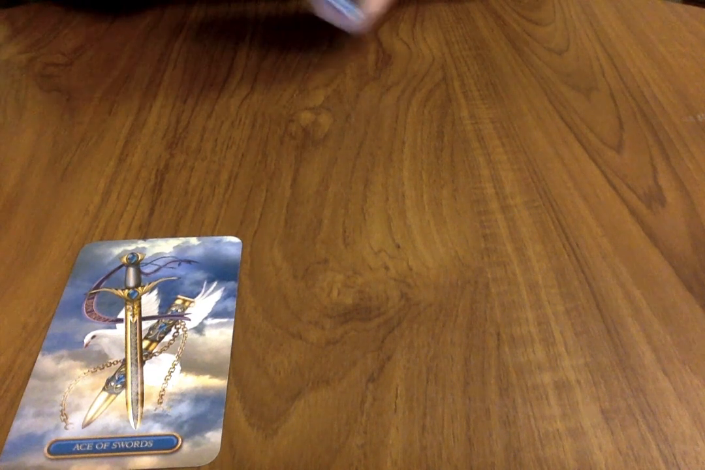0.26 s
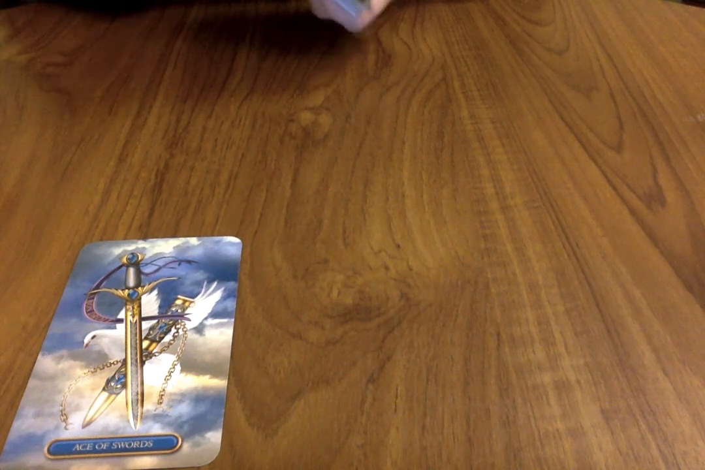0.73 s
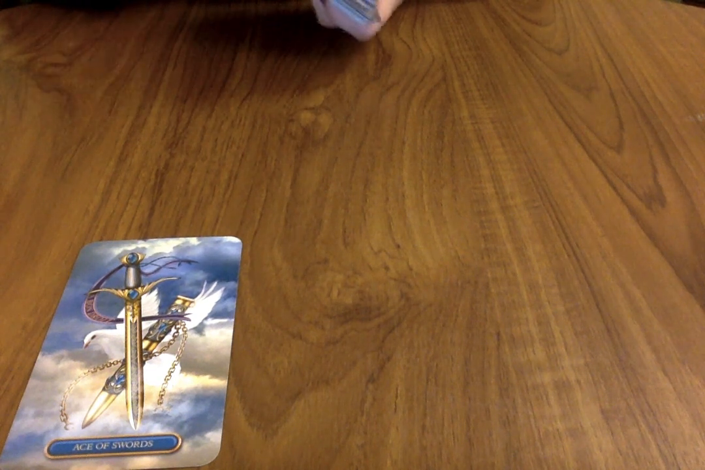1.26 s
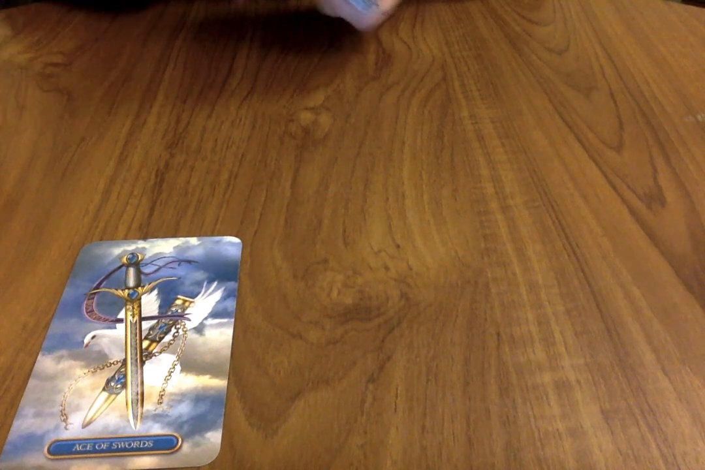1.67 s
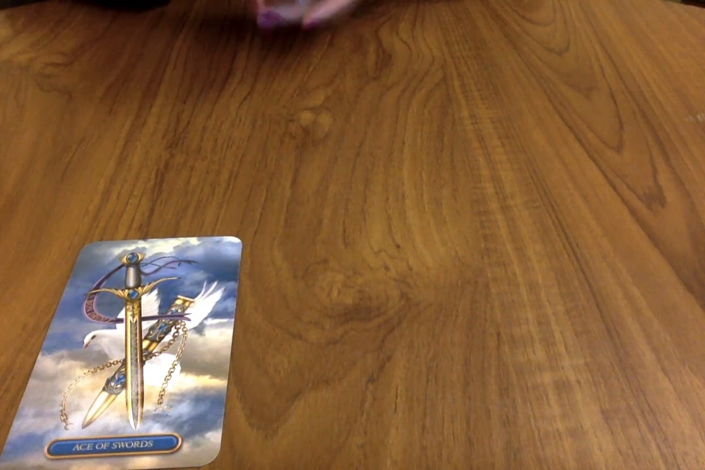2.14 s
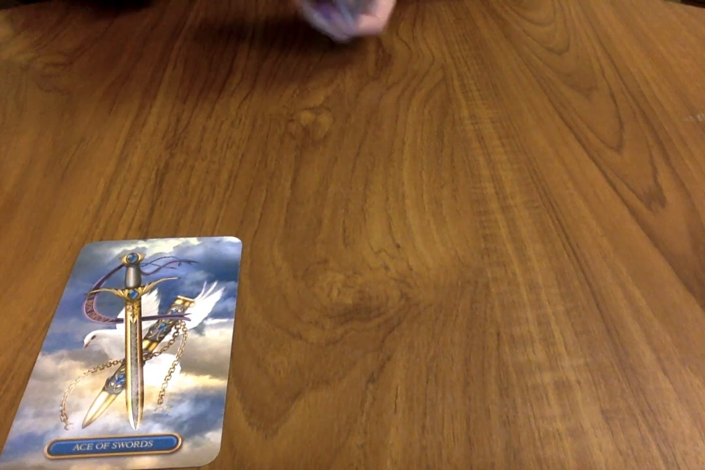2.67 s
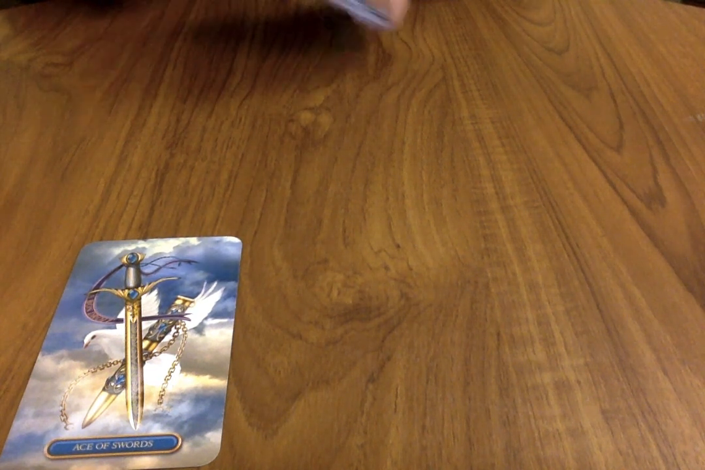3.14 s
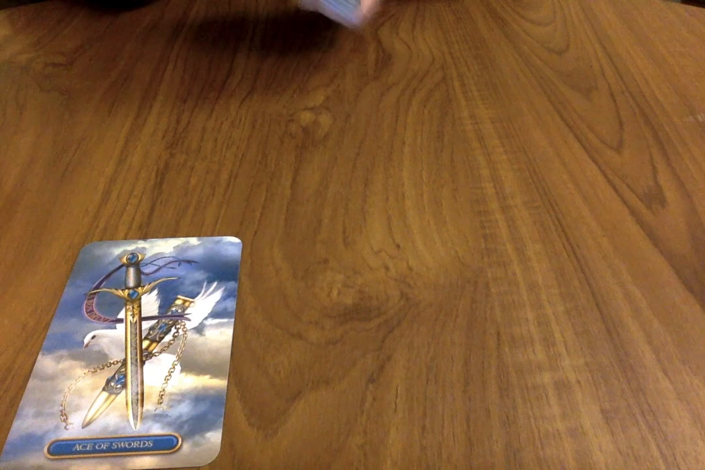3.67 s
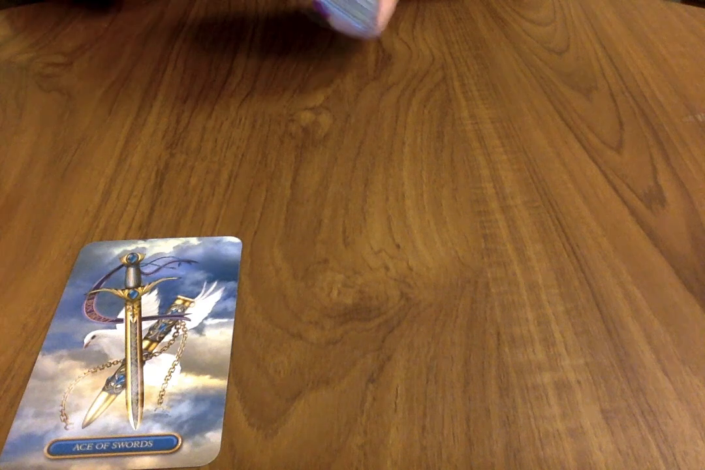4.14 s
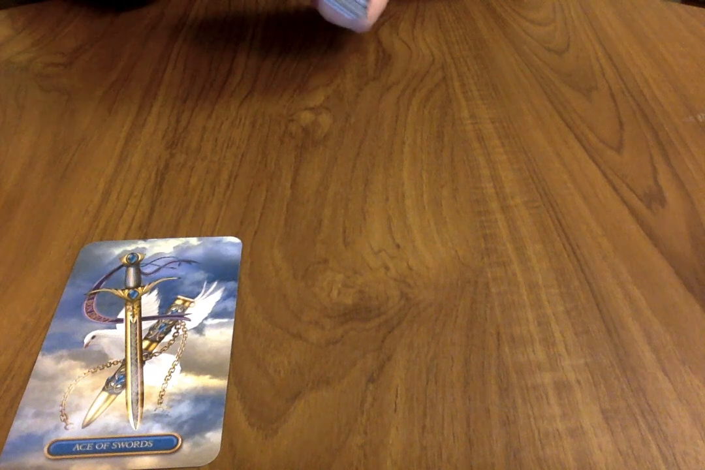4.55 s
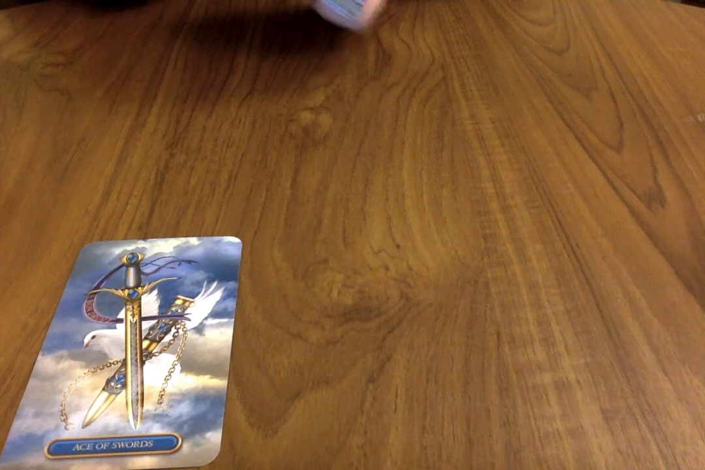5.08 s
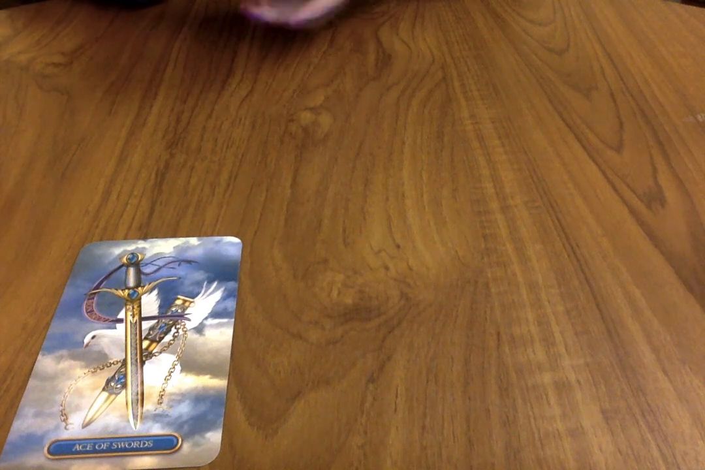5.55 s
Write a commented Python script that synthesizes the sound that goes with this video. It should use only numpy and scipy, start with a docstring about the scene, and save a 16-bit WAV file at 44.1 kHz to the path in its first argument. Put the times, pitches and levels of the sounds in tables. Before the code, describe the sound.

Glossy cards are shuffled by hand over a wooden table, with hissing slides and quick, irregular flicks and slaps.

```python
"""Just above a wooden table in a small room, glossy cards are shuffled overhand, close to a microphone.
Packets slide with a gritty hiss, zip free, then land in quick flicks and slaps that ring the deck
and the table top. Nudged by the hands, the table wobbles at its lowest mode. The room adds a short
tail, and the loudest slaps overload the input."""
import sys
import numpy as np
from scipy import signal
from scipy.fft import rfft, irfft, next_fast_len
from scipy.io import wavfile
from scipy.ndimage import uniform_filter1d

SR = 44100
rng = np.random.default_rng(int(sys.argv[2]) if len(sys.argv) > 2 else 0)


def generate_wav(signal):
    """Clip the signal to [-1, 1] and save it as 16-bit WAV at the path in sys.argv[1]."""
    frames = np.transpose(np.atleast_2d(signal))
    scaled = np.clip(frames, -1, 1) * 32767
    pcm = np.round(scaled).astype(np.int16)
    wavfile.write(sys.argv[1], SR, pcm)


N = 256662


def undb(db):
    """Level in dB to gain."""
    return 10 ** (np.asarray(db) / 20)


def unit(x):
    """x scaled to rms 1."""
    return x / np.sqrt(np.mean(x ** 2))


def colour(x, shape):
    """x filtered by a curve of (freq_hz, gain_db) points."""
    hz, db = np.transpose(shape)
    size = next_fast_len(len(x))
    bins_hz = np.maximum(np.fft.rfftfreq(size, 1 / SR), 1)
    gain = undb(np.interp(np.log(bins_hz), np.log(hz), db))
    return irfft(rfft(x, size) * gain, size)[:len(x)]


def ring(x, hz, width_hz):
    """One resonance, gain 1 at its centre."""
    return signal.lfilter(*signal.iirpeak(hz, hz / width_hz, SR), x)


def grit(count, spread_db):
    """Noise with very unequal grains, rms 1."""
    noise = rng.standard_normal(count)
    return unit(noise * undb(spread_db * np.minimum(rng.exponential(size=count), 6.5)))


def walk(rate_hz):
    """Random steps at rate_hz, smoothed twice, rms 1."""
    hold = int(SR / rate_hz)
    steps = np.repeat(rng.standard_normal(N // hold + 1), hold)
    return unit(uniform_filter1d(uniform_filter1d(steps, hold), hold)[:N])


def add(out, start_s, x):
    """Mix x into out from start_s."""
    i = int(start_s * SR)
    out[i:i + len(x)] += x[:N - i]


def background():
    """Faint steady noise, mostly bass."""
    # noise floor: freq_hz, density_db
    spectrum = [(24, -20), (40, 9), (319, -13), (5500, -31), (8240, -26), (13300, -38), (15800, -44)]
    return undb(-51) * unit(colour(rng.standard_normal(N), spectrum))


def room(x, t60_s=0.3, level_db=-17):
    """Short diffuse tail of a small room."""
    # tail colour: freq_hz, density_db
    spectrum = [(59, -35), (100, -6.5), (2000, -4.5), (3110, -11), (9460, -3), (13000, -10.5),
                (15000, -14.5)]
    t = np.arange(SR // 2) / SR
    envelope = (1 - np.exp(-t / 0.0005)) * undb(-60 * t / t60_s)
    tail = colour(rng.standard_normal(len(t)), spectrum) * envelope
    return undb(level_db) * signal.fftconvolve(x, tail / np.sqrt(np.sum(tail ** 2)))[:N]


def table_wobble(mode_hz=29.5, rise_s=.02, floor_db=-60):
    """Lowest table mode: a slightly wandering sine that swells at each nudge and dies away."""
    # hands nudge the table: start_s, level_db, t60_s (short while the wrists rest on it)
    nudges = [(0, -32, 1.2), (.33, -37, 1.2), (.56, -30, .9), (.83, -36, 1.2), (1.1, -30, 1.5),
              (1.17, -27, 1.1), (1.45, -34, 1.3), (2.42, -29, .35), (3.1, -36, .3), (3.36, -40, .5),
              (4.02, -37, .5), (4.5, -44, 1.6), (5.15, -36, 1.3), (5.33, -39, 1.2)]
    t = np.arange(N) / SR
    power = np.full(N, undb(floor_db) ** 2)
    for start_s, level_db, t60_s in nudges:
        add(power, start_s, ((1 - np.exp(-t / rise_s)) * undb(level_db - 60 * t / t60_s)) ** 2)
    throb_db = 1.3 * walk(8)
    hz = mode_hz * (1 + 0.022 * walk(15))
    return np.sqrt(2 * power) * undb(throb_db) * np.sin(2 * np.pi * np.cumsum(hz) / SR)


def slide_envelopes(cards, rest_db=-57):
    """Sheen, body and scrape gains: cards rub at rest, under the thumb and as they settle."""
    # thumb pulls cards across the deck: start_s, length_s, end_db, swell_db, scrape_db
    pulls = [(0, 0.066, -56.5, -13, 12), (0.163, 0.075, -26.5, 15.5, -6.5), (0.377, 0.064, -39, 1.5, -5),
             (0.48, 0.13, -20, 12.5, -11.5), (0.622, 0.026, -30.5, -6.5, 0),
             (0.676, 0.029, -19.5, 13.5, -1.5), (0.744, 0.059, -34, -5.5, 1.5),
             (1.078, 0.058, -22, 15.5, -23), (1.346, 0.08, -23.5, 17.5, -5), (1.628, 0.047, -24, 19, -3),
             (1.731, 0.032, -40.5, -2, 8.5), (1.794, 0.053, -31, 0, -8), (1.875, 0.078, -32.5, 14.5, -0.5),
             (2.025, 0.076, -34.5, 11, 1.5), (2.19, 0.048, -40, 0, 0), (2.301, 0.074, -34, 1.5, -8),
             (2.381, 0.067, -25, 3, -18), (2.492, 0.23, -37.5, 0, 7), (2.683, 0.039, -28, 12, 8),
             (2.91, 0.028, -47, 11, 4), (3.002, 0.044, -25, 12.5, -9), (3.056, 0.068, -23, 7.5, 1.5),
             (3.318, 0.1, -21.5, 14, -5.5), (3.614, 0.079, -29, 7, -7), (3.68, 0.069, -22, 6, -11),
             (3.91, 0.0866, -19.5, 24.5, -7), (4.223, 0.035, -30, 5.5, -5.5), (4.273, 0.11, -28.5, 0, -5.5),
             (4.447, 0.085, -27, 6.5, -8.5), (4.544, 0.088, -36, -4, 2.5), (4.823, 0.093, -31, 1, -4.5),
             (4.99, 0.037, -38, 7, -9.5), (5.093, 0.011, -31, 5, 3.5), (5.283, 0.069, -41, -11, -7.5),
             (5.358, 0.063, -31.5, 9, -3.5), (5.523, 0.072, -45, -7.5, -2), (5.755, 0.071, -31.5, 14, 1.5)]
    grip_db_per_s, release_db_per_s = 1202, 705.5
    settle_db_per_s, sheen_extra_db_per_s = 246, 195
    t = np.arange(SR // 2) / SR
    sheen, body, scrape = np.full((3, N), undb(rest_db) ** 2)
    for start_s, length_s, end_db, swell_db, scrape_db in pulls:
        begin_s = max(start_s - .1, 0)
        since_s = t + begin_s - start_s
        remaining = 1 - np.clip(since_s / length_s, 0, 1)
        grip_db = grip_db_per_s * np.maximum(-since_s, 0)
        release_db = release_db_per_s * np.maximum(since_s - length_s, 0)
        power = undb(end_db - swell_db * remaining ** 0.9 - grip_db - release_db) ** 2
        add(sheen, begin_s, power)
        add(body, begin_s, power * undb(1.5 + 0.46 * scrape_db) ** 2)  # thin if cards bend little
        add(scrape, begin_s, power * undb(scrape_db) ** 2)
    for start_s, level_db, _, treble_db, *_ in cards:
        power = undb(level_db - settle_db_per_s * t) ** 2
        sheen_db = -23.5 + 0.44 * treble_db - sheen_extra_db_per_s * t  # dull landings hiss less
        add(sheen, start_s, power * undb(sheen_db) ** 2)
        add(body, start_s, power * undb(-28.5) ** 2)
        add(scrape, start_s, power * undb(-22) ** 2)
    return np.sqrt([sheen, body, scrape])


def varnish_hiss(flicker_db=2.2, split_hz=6060):
    """Varnish friction, flickering by band; returns the sheen above split_hz and the body below."""
    # friction hiss: freq_hz, density_db
    spectrum = [(1760, -34), (3000, -5), (4710, -4), (11300, -0.5), (13900, -5), (15800, -1)]
    # borders of the flickering bands: edge_hz
    edges_hz = (4500, 7000, 9500, 12000)
    steady = unit(colour(grit(N, 1.8), spectrum))
    lowpassed = [signal.sosfilt(signal.butter(2, hz, fs=SR, output="sos"), steady) for hz in edges_hz]
    bands = np.diff([np.zeros(N), *lowpassed, steady], axis=0)
    hiss = sum(band * undb(flicker_db * walk(70)) for band in bands)
    hiss *= undb(1.48 * walk(90) - 1.5)
    body = colour(hiss, [(split_hz / 1.1, 0), (split_hz, -30)])
    return hiss - body, body


def bending_scrape(top_hz=4770):
    """Dull, jerky scrape of bending cards."""
    rub = colour(grit(N, 2.9), [(top_hz, 0), (2 * top_hz, -15)])
    scrape = unit(ring(rub, 2050, 2500)) + undb(-2.5) * unit(ring(rub, 460, 480))
    return undb(3.5 * walk(60) - 10.5) * scrape


def edge_catches(band_rate_per_s=25):
    """Sliding edges catch: random ticks in four bands."""
    ticks = (rng.random((4, N)) < band_rate_per_s / SR) * rng.standard_normal((4, N))
    bands_hz = (2300, 3700, 6000, 9500)
    return sum(np.sqrt(SR / hz) * ring(train, hz, hz / 4) for train, hz in zip(ticks, bands_hz))


def slide(cards):
    """Card on card: hiss, scrape and catches under their envelopes."""
    sheen_gain, body_gain, scrape_gain = slide_envelopes(cards)
    sheen, body = varnish_hiss()
    scrape = bending_scrape()
    return sheen_gain * (sheen + undb(15) * edge_catches()) + body_gain * body + scrape_gain * scrape


def zips(whistle_width_hz=1800):
    """Jerky swells of hiss as a packet speeds up and lets go; the closing gap whistles and glides."""
    # packets zip free: start_s, length_ms, level_db, first_hz, last_hz, peak_fraction
    releases = [(0.221, 19, -17, 8500, 7380, 0.45), (0.266, 13.6, -12.5, 11000, 7000, .2),
                (0.565, 50, -13, 8000, 9460, 0.42), (0.712, 38, -12, 10360, 8930, 0.24),
                (1.113, 33, -27, 10100, 10300, .5), (1.404, 29, -29, 8700, 8930, 0.73),
                (1.662, 14, -22, 7220, 7900, .5), (2.417, 18, 2, 7500, 9600, .55),
                (3.097, 9.9, -13.5, 9500, 12000, 0.54), (3.399, 32, -7, 7000, 12980, 0.37),
                (3.74, 16, -15.5, 6510, 6955, .5), (4.009, 30.7, -2.5, 6802, 11460, 0.39),
                (4.798, 18, -25, 9900, 9000, 0.33), (5.397, 28.5, -25.5, 8000, 8390, 0.43)]
    out = np.zeros(N)
    for start_s, length_ms, level_db, first_hz, last_hz, peak_fraction in releases:
        count = int(length_ms * SR / 1000)
        progress = np.linspace(0, 1, count)
        skew = np.log(.5) / np.log(np.clip(peak_fraction, .05, .95))
        swell = np.sin(np.pi * progress ** skew) ** 0.76
        centre_hz = np.sqrt(first_hz * last_hz)
        width_hz = 1.44 * centre_hz
        hiss = unit(ring(ring(grit(count, 2), centre_hz, width_hz), centre_hz, width_hz))
        drift = uniform_filter1d(rng.standard_normal((2, count)), int(SR / whistle_width_hz))
        phase = 2 * np.pi * np.cumsum(first_hz * (last_hz / first_hz) ** progress) / SR
        whistle = unit(drift[0] * np.cos(phase) + drift[1] * np.sin(phase))
        jerk_db = 1.6 * unit(uniform_filter1d(rng.standard_normal(count), SR // 500))
        add(out, start_s, undb(level_db + jerk_db) / 2 * swell * unit(hiss + whistle))
    return out


def landings(gap_ms=5.5, scatter_db=1.5):
    """One row per falling card: the tap columns plus in_packet. Packets land unevenly, card by card."""
    # lone cards: start_s, level_db, pitch_hz, treble_db, thud_db
    taps = [(0.179, -26.5, 1980, -2, -9.5), (0.22, -5.5, 3670, -21, -20.5), (.46, -21.5, 550, -4, -11),
            (.558, -16.5, 414, -13, -10.5), (0.795, -24, 660, 14, -9), (0.83, -21, 3250, -5, -24),
            (.863, -30, 405, -32.5, 6), (1.075, -12.5, 860, -5, -21.5), (1.134, -12.5, 2540, -6, -9),
            (1.168, -22.5, 400, -22, -7), (1.351, -28, 627, 4.5, -16), (1.407, -26.5, 596, -13, -3),
            (1.449, -22, 424, -26, -1.5), (1.619, -12, 1490, 1, -18), (1.659, -25, 380, 4, -6.5),
            (1.937, -20, 4300, 3.5, -46), (2.084, -18, 3146, -17, -38), (2.142, -30, 1320, 9, -14),
            (2.594, -14, 418, -20, -17), (2.56, -11.5, 520, -25, -23), (2.608, -8, 600, -29, -19),
            (2.647, -5.5, 1690, -8, -25), (2.668, -14.5, 1700, -24, -10), (2.95, -26.5, 1300, 3.5, -18),
            (3.09, -20.5, 430, 10, -12), (3.112, -15, 1010, 0, -68), (3.131, -12, 457, -17, -14.5),
            (3.626, -23, 430, -10.5, -11.5), (3.93, -29.5, 784, 11.5, -15), (3.968, -20, 571.6, -9, -7),
            (4.046, -2, 3850, -4, -30), (4.223, -24.5, 534, -14, -9.5), (4.561, -16.5, 1590, -22, -27),
            (4.647, -15.5, 925, -8, -14), (4.82, -5, 2810, -29, -31), (4.844, -20, 579, 12, -10.5),
            (4.9321, -14.5, 1360, 5.5, -41), (5.098, -4, 1140, -1, -19), (5.142, -11.5, 2720, 0, -27),
            (5.183, -33, 400, -20, 0.5), (5.479, -24, 6150, -13, -38), (5.535, -34, 910, 10.5, -15)]
    # packets: start_s, length_ms, first_db, last_db, first_hz, last_hz, treble_db, thud_db
    packets = [(.278, 7.9, -14.5, -10, 910, 3430, -6, -13), (0.3032, 3.5, -9, -16, 620, 4800, -2.5, -10),
               (.585, 7.3, 3.5, -11, 1710, 400, -6, -28), (.758, 8.4, -11, -13.5, 2340, 605, -24, -31),
               (2.438, 14, 1, 3.5, 803, 520, 1, -19), (2.484, 8.6, -19.5, -9.5, 1396, 800, 2.5, -12),
               (2.536, 5.3, -5.5, -2.5, 880.6, 2380, -17, -42),
               (2.69, 5.5, -7.5, -2.5, 700, 1270, -6.5, -45.5),
               (2.703, 24.6, -5, -1.5, 1090, 1680, -10, -37), (2.731, 16, 5.5, -7, 1600, 1050, -13, -55.5),
               (2.754, 10, -3.5, -6, 1020, 1110, -12.5, -25), (3.354, 26, -27.5, -22, 476.2, 770, 10, -4.5),
               (3.44, 9.9, -1.5, -0.5, 900, 2160, 3.5, -26), (3.455, 11.5, -15.5, -17, 780, 670, -5, -10),
               (3.752, 10.4, -12.5, -15.5, 3150, 434, -1.5, -13),
               (4.037, 12.07, -6, -2.5, 710, 1490, -2.5, -20), (4.323, 12.2, -20, -22, 3560, 690, -2, -19),
               (4.483, 8.5, -16, -5, 4200, 1960, -34, -37), (4.529, 6.7, -5, -7.5, 2370, 1740, -31, -26),
               (5.107, 13.25, -8.5, -3.5, 2380, 2690, -8, -20)]
    cards = [(*tap, False) for tap in taps]
    draws = rng.standard_normal((len(packets), 2, 8))
    for packet, (lag, size) in zip(packets, draws):
        start_s, length_ms, first_db, last_db, first_hz, last_hz, treble_db, thud_db = packet
        count = max(2, 1 + round(length_ms / gap_ms))
        for k, progress in enumerate(np.linspace(0, 1, count)):
            jitter_s = .004 * progress * (1 - progress) * lag[k]
            land_s = start_s + progress * length_ms / 1000 + jitter_s
            level_db = first_db + (last_db - first_db) * progress + scatter_db * size[k]
            pitch_hz = first_hz * (last_hz / first_hz) ** progress
            cards.append((land_s, level_db, pitch_hz, treble_db, thud_db, True))
    return cards


def deck_ring(flick):
    """Deck modes driven by a flick; their shares vary with the landing spot."""
    # deck modes: freq_hz, width_hz, gain_db
    modes = [(414, 130, 2), (627, 284, 4.5), (910, 86, -2), (1358, 47, 4), (1717, 87, 4.5)]
    spots = undb(3 * rng.standard_normal(len(modes)))
    return sum(spot * undb(gain_db) * ring(flick, hz, width_hz)
               for spot, (hz, width_hz, gain_db) in zip(spots, modes))


def table_ring(flick, pitch_hz, drive_db):
    """The table top rings on after a blow with the energy of the flick."""
    # table-top modes: freq_hz, gain_db, t60_s
    modes = [(770, -10, 0.2), (1001, 0, 0.05), (1270, -6, 0.52), (1400, -9.5, 0.18), (1765, -5, 0.41),
             (2207, 0.5, 0.33)]
    spots = undb(drive_db + 2 * rng.standard_normal(len(modes)))
    detunes = 1 + .012 * rng.standard_normal(len(modes))
    blow = ring(ring(signal.unit_impulse(len(flick)), pitch_hz, pitch_hz / 2), pitch_hz, pitch_hz)
    blow *= np.std(flick) / np.std(blow)
    return sum(spot * undb(gain_db) * ring(blow, hz * detune, 1.9 / t60_s)
               for spot, detune, (hz, gain_db, t60_s) in zip(spots, detunes, modes))


def air_thud(t):
    """Air squeezed from between the cards: a soft negative push."""
    hz = 210 * np.exp(0.2 * rng.standard_normal())
    cycles = hz * t
    return -(np.sin(2 * np.pi * cycles) + np.sin(.6 * np.pi * cycles)) * np.exp(-cycles / 0.87)


def slaps(cards, snap_db=16):
    """Each landing: a rattling contact rings card, deck and table, with a crack above, a thud below."""
    # contact decay: lone_card_s, packet_card_s
    lone_card_s, packet_card_s = 0.0038, 0.0056
    out, t = np.zeros(N), np.arange(8192) / SR
    for start_s, level_db, pitch_hz, treble_db, thud_db, in_packet in cards:
        contact_s = packet_card_s if in_packet else lone_card_s
        envelope = (1 - np.exp(-t / 0.00018)) * (np.exp(-t / contact_s) + 1.08 * np.exp(-t / 0.00081))
        snap = (t == 0) * (0 if in_packet else undb(snap_db))  # a lone card's edge ticks first
        rattle = envelope * grit(len(t), 2.82)
        flick = ring(rattle - snap, pitch_hz, 2.07 * pitch_hz)
        tone = (1.5 if in_packet else 1) * ring(flick, pitch_hz, max(pitch_hz / 5, 260))
        card = ring(flick, pitch_hz, 1.6 * pitch_hz) + tone
        drive_db = .35 * level_db + (6 if in_packet else -1)  # hard slaps reach the table most
        knock = card + deck_ring(flick) + table_ring(flick, pitch_hz, drive_db)
        crack = envelope * ring(grit(len(t), 1.6), 4900, 7900) - ring(snap, 4900, 11000)
        parts = ((0, knock), (treble_db, crack), (thud_db + 6.5, air_thud(t)))
        slap = sum(undb(peak_db) * part / np.abs(part).max() for peak_db, part in parts)
        add(out, start_s, undb(level_db) * slap)
    return out


def scene():
    """Background, table wobble, and the shuffle with its room tail; mono."""
    cards = landings()
    shuffle = slide(cards) + zips() + slaps(cards)
    return (background() + room(shuffle) + table_wobble() + shuffle)[None]


def record(dry, ceiling=.66, top_hz=15700):
    """Input stage: soft clip, then a steep low-pass."""
    clipped = dry / (1 + np.abs(dry / ceiling) ** 4) ** (1 / 4)
    return signal.sosfilt(signal.ellip(10, .2, 80, top_hz, fs=SR, output="sos"), clipped)


dry = scene()
out = record(dry)
generate_wav(out)
```